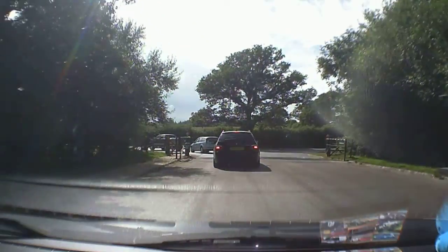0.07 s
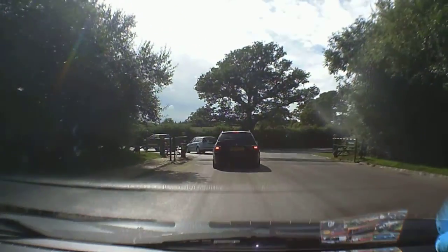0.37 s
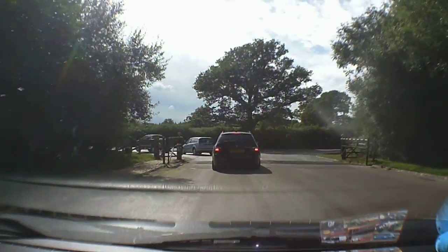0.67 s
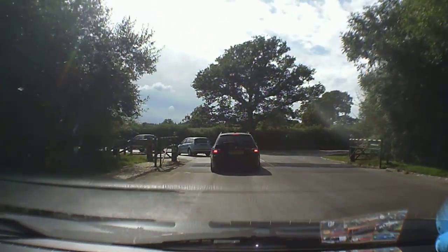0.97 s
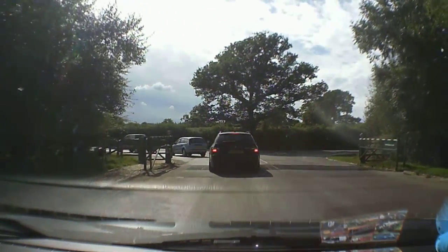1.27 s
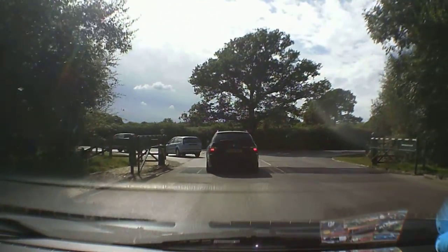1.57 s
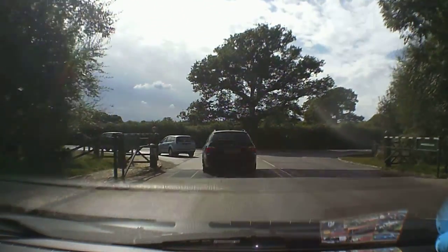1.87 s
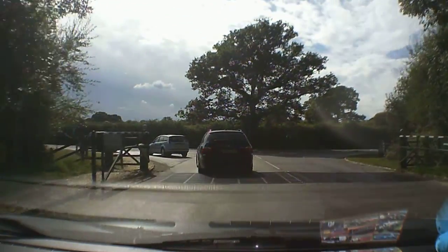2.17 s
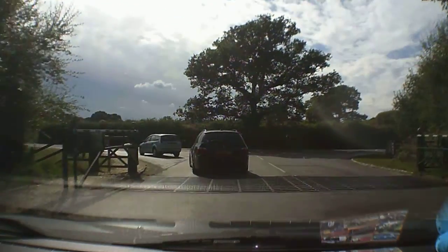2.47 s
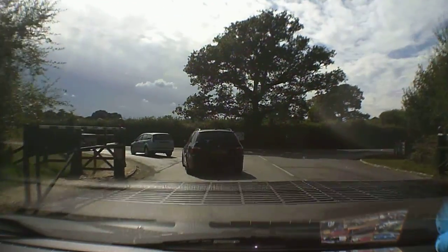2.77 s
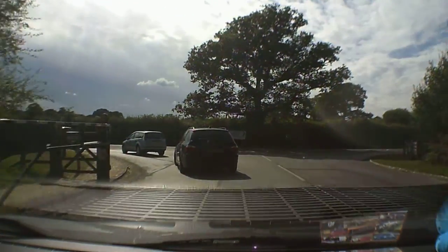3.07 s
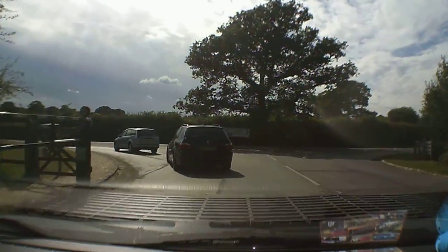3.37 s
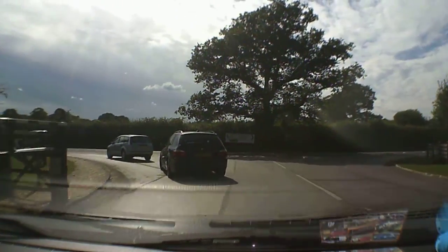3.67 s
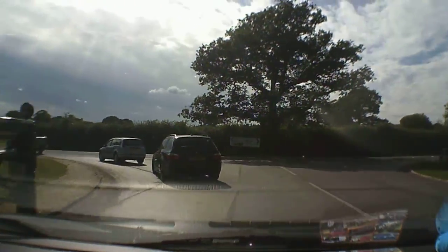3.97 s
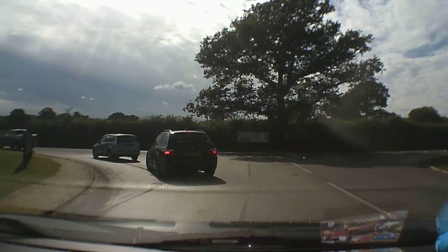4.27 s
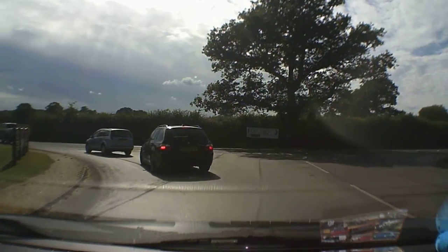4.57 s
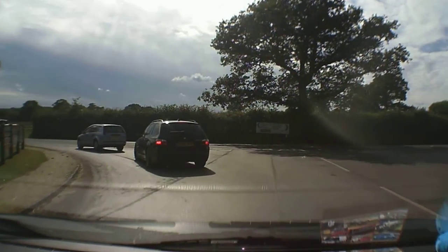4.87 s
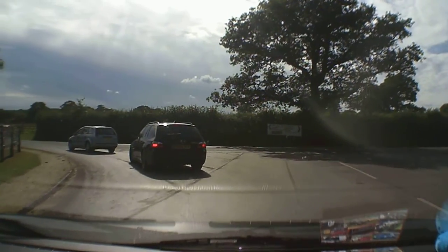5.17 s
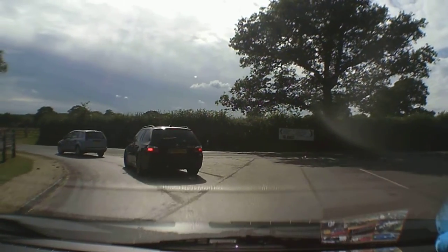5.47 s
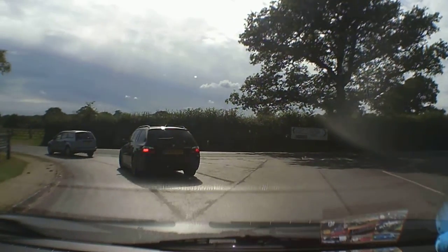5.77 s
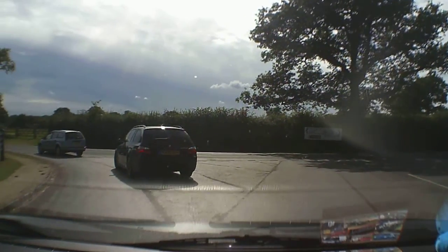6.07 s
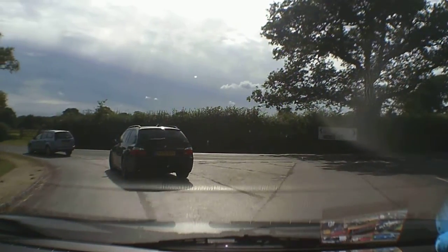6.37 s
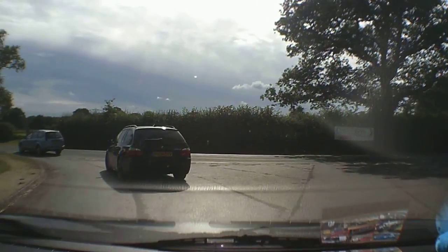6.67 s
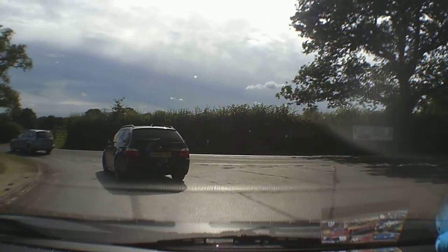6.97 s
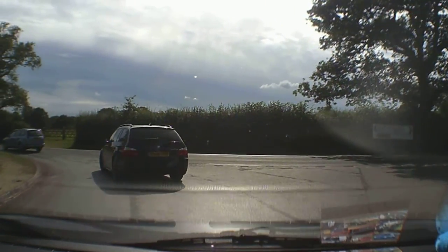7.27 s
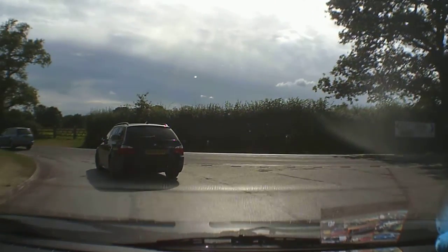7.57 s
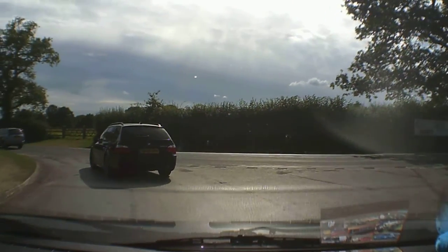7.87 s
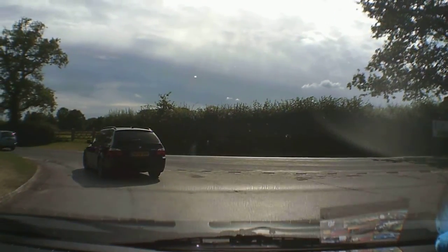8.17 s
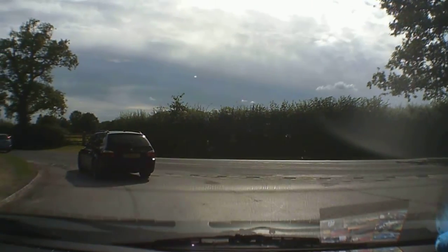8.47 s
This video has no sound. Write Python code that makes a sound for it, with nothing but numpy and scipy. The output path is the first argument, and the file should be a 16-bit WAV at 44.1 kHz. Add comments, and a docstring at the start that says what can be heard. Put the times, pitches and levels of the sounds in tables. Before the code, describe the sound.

A car rumbles slowly along rough asphalt, heard from a small microphone in the cabin, with a soft engine drone and a faint gear whine. Around four seconds in comes the loudest event, a rapid run of thumps and metallic rattling as both axles roll over a steel grid, shaking the plastic trim. After about a second and a half the steady rumble returns, and the engine finally pulls a little harder.

```python
"""Inside a car rolling slowly over a cattle grid, heard from a small camera behind the windscreen.
Front, then rear tyres drop on bar after bar. The impacts excite the modes of the body, which booms,
and of the steel grid, which clatters and rings; a loose plastic part ticks and the trim crackles.
Beneath lie the rumble of rough asphalt, the harmonics of an engine that picks up at the end,
a gear whine and the hiss of the camera's electronics."""
import sys
import numpy as np
from scipy import signal
from scipy.fft import rfft, irfft, next_fast_len
from scipy.io import wavfile
from scipy.ndimage import uniform_filter1d

SR = 44100
rng = np.random.default_rng(int(sys.argv[2]) if len(sys.argv) > 2 else 0)


def store_wav(level_fs):
    """Save 16-bit WAV to argv[1]."""
    pcm = np.round(np.clip(np.atleast_2d(level_fs), -1, 1) * 32767)
    wavfile.write(sys.argv[1], SR, pcm.T.astype(np.int16))


N = 380583
T = np.arange(N) / SR

# force of each axle's blows along the grid: (time [s], relative thump [dB], relative clatter [dB])
FRONT_BLOWS = [(3.92, -17, -45.5), (4.0, -17, -42.5), (4.18, -18.5, -39.5), (4.319, -22.5, -42),
               (4.47, -18, -40.5), (4.56, -17, -39), (4.67, -21, -41)]
REAR_BLOWS = [(4.485, -20, -41), (4.64, -18, -41), (4.7, -12.5, -39), (4.76, -16.5, -41.5),
              (4.91, -19.5, -44), (5.06, -26.5, -48.5), (5.16, -14, -52), (5.28, -19.5, -47)]
# spectrum of the clatter under each axle: (frequency [Hz], relative level [dB])
FRONT_SPECTRUM = [(71, -34), (120, -10), (157, -2.5), (308, -12.5), (372, -9.5), (561, -22), (638, -18),
                  (753, -21.5), (942, -22), (1020, -20.5), (2000, -42.5), (2600, -67), (4400, -120)]
REAR_SPECTRUM = [(71, -33), (120, -3), (143, -5.5), (188, -6.5), (232, -9), (287, -23), (403, -19),
                 (438, -22), (1160, -23), (1530, -33.5), (2000, -50), (2600, -83), (4400, -120)]

def cattle_grid():
    """Impact excitation: the front wheels cross with a bright clatter, the rear with a deep boom."""
    times, thumps, clatters = bar_blows(FRONT_BLOWS, first_s=3.915, count=15)
    front = body_boom(times, thumps - 2.5, axle="front")
    front += grid_clatter(times, clatters, FRONT_SPECTRUM, rattle_db=-1, rattle_t60=0.44,
                          steel_db=-12.5, slap_db=-3, slap_t60=0.052)
    front += wheel_knocks(times, clatters + 12)
    times, thumps, clatters = bar_blows(REAR_BLOWS, first_s=4.484, count=16)
    rear = body_boom(times, thumps + 0.75, axle="rear")
    rear += grid_clatter(times, clatters, REAR_SPECTRUM, rattle_db=0.2, rattle_t60=0.42,
                         steel_db=-21, slap_db=-17, slap_t60=0.055)
    rear += wheel_knocks(times, clatters + 3.5)
    return front + rear

def bar_blows(blows, first_s, count, period_s=0.0533, scatter_db=1.0):
    """Periodic forcing: at a steady speed the tyres meet the bars evenly, though with uneven force."""
    times = first_s + period_s * np.arange(count)
    at, *levels = np.transpose(blows)
    thumps, clatters = (np.interp(times, at, db) + scatter_db * rng.standard_normal(count)
                        for db in levels)
    return times, thumps, clatters

# body and cabin modes: (frequency [Hz], T60 [s], gain from front axle [dB], gain from rear axle [dB])
BODY_MODES = [(31.7, 0.4, -19, -7), (38.95, 0.3, -6.5, 0.5), (58.1, 0.12, -6.5, -4.5), (80, 0.11, -4, -9.5),
              (96.3, 0.14, -4, -11), (109.4, 0.07, -6.5, -14), (149, 0.11, -11.5, -23.5),
              (227, 0.11, -20.5, -41)]

def body_boom(times, levels_db, axle):
    """Modal superposition: each blow through the springs shares itself differently among the modes."""
    scatter_db = 1.8 * rng.standard_normal((len(times), len(BODY_MODES)))
    out = np.zeros(N)
    for k, (hz, t60, front_db, rear_db) in enumerate(BODY_MODES):
        mode = (-1) ** k * ring([(hz, t60, front_db if axle == "front" else rear_db)])
        out += strike(times, levels_db + scatter_db[:, k], mode)
    return out

# modes of the steel grid: (frequency [Hz], T60 [s], relative level [dB])
STEEL_MODES = [(378, .12, -4), (403, .14, -6), (647, .3, 0), (703, .09, -9), (1011, .2, -14),
               (1165, .26, -11.5)]

def grid_clatter(times, levels_db, spectrum, rattle_db, rattle_t60, steel_db, slap_db, slap_t60):
    """Incoherent summation: blows add in power as the loose grid chatters and the dashboard buzzes."""
    onset = 1 - np.exp(-T[:SR] / 0.0023)  # the soft tyre spreads each slap in time
    shake = (fade(rattle_t60) + undb(slap_db) * fade(slap_t60)) * onset
    chatter = np.sqrt(strike(times, 2 * levels_db, shake ** 2))
    rattle = chatter * noise(spectrum) * unit(undb(1.7 * walk(260)))
    response = ring(STEEL_MODES)
    steel = signal.fftconvolve(chatter * rng.standard_normal(N), response / np.linalg.norm(response))[:N]
    buzz = noise([(800, -14), (1900, 7.5), (3500, 3), (6000, -3.5), (15000, -16)])
    dashboard = chatter * buzz * undb(3.5 * walk(400))
    return undb(rattle_db) * rattle + undb(steel_db) * steel + undb(-32) * dashboard

# modes of a tyre's knock through the suspension: (frequency [Hz], T60 [s], relative level [dB])
WHEEL_MODES = [(130, 0.063, 2.5), (184, 0.048, -1), (344, .025, -2.5), (480, 0.032, -5), (656, 0.024, -5),
               (950, 0.0065, -14.5), (1250, 0.016, -15.5)]

def wheel_knocks(times, levels_db, leave_s=0.039, leave_db=-9):
    """Structure-borne sound: a tyre knocks on meeting a bar and again, more softly, on leaving it."""
    return taps(np.append(times, times + leave_s), np.append(levels_db, levels_db + leave_db),
                WHEEL_MODES, detune=0.071, scatter_db=3.5)

def rocking(start_s=5.335, hz=28, t60=0.9, db=-22.5):
    """Damped mass-spring oscillation: the car rocks on its springs as it leaves the grid."""
    return strike([start_s], [db], ring([(hz, t60, 0)]))

# landings of the plastic part: (time [s], relative peak level [dB])
LANDINGS = [(3.925, -52), (3.9784, -50), (4.0305, -44.5), (4.0831, -43.5), (4.1355, -57), (4.1914, -58),
            (4.245, -48.5), (4.2737, -53), (4.2986, -40.5), (4.353, -43), (4.4078, -52), (4.4618, -59),
            (4.5113, -46.5), (4.5376, -51), (4.565, -56), (4.59, -49), (4.6195, -45.5), (4.6438, -51),
            (4.7222, -47.5), (4.7505, -51), (4.7754, -55), (4.802, -45.5), (4.8294, -63), (4.8558, -59),
            (4.8833, -62), (4.9112, -62), (4.9641, -52), (5.0895, -57), (5.1407, -65), (5.1931, -64)]
# its modes: (frequency [Hz], T60 [s], relative level [dB])
PLASTIC_MODES = [(2360, .011, 0), (2680, .0095, 0), (3500, .005, -18), (4480, .008, -12), (4700, .009, -11)]

def loose_plastic():
    """Damped free vibration: a jolted part lands with a dry crack and rings for milliseconds."""
    times, levels_db = np.transpose(LANDINGS)
    contact = noise([(900, -13), (1700, -4), (3000, -2), (6000, -14), (12000, -30)])
    crack = strike(times, levels_db, fade(0.021)) * contact
    clacks = taps(times, levels_db, PLASTIC_MODES, detune=0.018, scatter_db=2.2)
    return undb(1) * clacks + undb(-16) * crack

# the main crackles: (time [s], dull band level [dB], bright band level [dB], duration [s])
TRIM_CRACKLES = [(.47, -79, -76, .004), (.828, -72, -73, .004), (2.56, -72, -80, .003),
                 (2.818, -72, -82, 0.011), (3.338, -63.5, -76, .008), (4.185, -72, -71, .003),
                 (4.195, -68, -69, 0.0034), (4.205, -72, -68, .002), (4.231, -71, -71, 0.0014),
                 (4.375, -69, -69, 0.0064), (4.665, -72, -71, .012), (4.682, -55.5, -63, 0.0098),
                 (5.324, -72, -79, .004), (5.343, -70, -75, .008), (5.43, -74, -74, .003),
                 (5.49, -72, -71, .004), (6.581, -73, -80, 0.0021), (7.753, -68, -72, .007),
                 (7.769, -71, -73, .004), (8.13, -68, -72, .011), (8.343, -72, -80, 0.0037),
                 (8.415, -70, -71, 0.0027), (8.426, -72, -72, 0.0028), (8.434, -68, -76, .012)]

def trim_crackles(slip_size=0.45, averaging_s=0.0071):
    """Stick-slip friction: as the body twists, the trim yields in a snap and a few smaller slips."""
    dull, bright = np.zeros(N), np.zeros(N)
    faint = [(s, -75.5, -73, 0.2) for s in rng.uniform(4.0, 6.5, size=14)]  # while the body is shaken
    for s, dull_db, bright_db, length in list(TRIM_CRACKLES) + faint:
        delays = np.append(0, rng.uniform(0, length, size=7))
        slips = np.append(1, slip_size * rng.standard_normal(size=7))
        slips *= np.sqrt(averaging_s * SR) / np.linalg.norm(slips)
        for delay, slip in zip(delays, slips):
            add(dull, s + delay, [undb(dull_db) * slip])
            add(bright, s + delay, [undb(bright_db) * slip])
    return (tint(dull, [(700, -22), (1700, 7.5), (4200, 1.5), (7000, -8), (15000, -30)])
            + tint(bright, [(3000, -13), (6500, -3), (9000, -1), (15600, 0)]))

# knocks in the cabin: (time [s], relative level [dB], centre frequency [Hz], bandwidth [Hz], T60 [s])
PANEL_KNOCKS = [(3.339, -52.5, 1380, 480, 0.035), (3.34, -54, 790, 450, 0.066), (3.458, -46, 410, 60, 0.1),
                (3.546, -62, 1300, 400, 0.031), (3.624, -57, 457, 300, 0.22), (3.822, -38.5, 130, 90, 0.17),
                (3.84, -58, 1270, 400, 0.03), (3.852, -58, 400, 295, 0.1), (3.862, -35.5, 127, 91.3, 0.096),
                (5.03, -28, 115, 60, 0.087), (5.187, -37, 115, 60, 0.081), (6.583, -48, 260, 258, 0.14)]

def panel_knocks():
    """Resonance: panels knock; the deep ones thud just before the grid and as the rear wheels cross."""
    out = np.zeros(N)
    for s, db, hz, width_hz, t60 in PANEL_KNOCKS:
        b, a = signal.iirpeak(hz, hz / width_hz, SR)
        panel = signal.lfilter(b, a, signal.lfilter(b, a, rng.standard_normal(N)))[-SR:]
        envelope = fade(t60) * (1 - np.exp(-hz * T[:SR]))  # a padded contact builds over about a cycle
        add(out, s, undb(db + 3) * unit(panel * envelope) * np.sqrt(np.mean(envelope ** 2)))
    return out

# rolling on asphalt: (time [s], relative rumble [dB], relative roar [dB])
ROLLING_LEVELS = [(0, -39.5, -66), (1.5, -39, -66), (2.6, -42.5, -69), (3.7, -42, -68.5),
                  (5.9, -41.5, -67.5), (6.6, -43.5, -70.5), (7.7, -41.5, -67.5), (8.1, -40.5, -63.5),
                  (8.6, -39, -63)]
# spectra of the body's rumble and the tread's roar: (frequency [Hz], relative level [dB])
RUMBLE_SPECTRUM = [(10, -9.5), (26, 3.5), (38, 7.5), (47, -0.5), (65, 3), (85, -7), (115, -6.5), (155, -10),
                   (185, -23), (225, -19.5), (300, -31), (600, -66.5)]
ROAR_SPECTRUM = [(150, -18.5), (260, 6), (345, 12), (430, 4.5), (640, 0.5), (830, -1.5), (980, -2.5),
                 (1170, -2), (1450, -9), (1800, -20.5), (2600, -23.5), (6000, -49)]

def road():
    """Roughness excitation: the body rumbles and the tread roars, louder over the grid's hollow pit."""
    rumble_db, roar_db = curves(ROLLING_LEVELS)
    over_pit = hold(3.81, 5.224, attack=0.15, release=0.36)
    rumble = noise(RUMBLE_SPECTRUM) * undb(rumble_db + 3 + 8.4 * over_pit + 1.3 * walk(12))
    roar = noise(ROAR_SPECTRUM) * undb(roar_db + 4 + 6.6 * over_pit + 1.1 * walk(25))
    return rumble + roar

# engine speed, with an abrupt sag as at a gear change: (time [s], firing rate [Hz])
FIRING_RATE = [(0, 36.2), (1.1, 37.2), (2.05, 32.34), (2.5, 34.9), (3.05, 32.7), (3.8, 34.7), (5.5, 35.03),
               (5.75, 37.12), (6.1, 36.22), (6.35, 32.6), (6.8, 32.58), (7.1, 36.9), (7.4, 36.55),
               (7.77, 39.73), (7.81, 21.37), (8.07, 38.34), (8.25, 43.07), (8.6, 40.25)]
# accelerator presses: (down [s], up [s], boom lift [dB], growl lift [dB], drone lift [dB])
PRESSES = [(0.347, 1.705, 11.5, -1, 0.5), (2.099, 2.743, 18, 10.5, 3.5), (3.3, 3.899, 11.5, 7.5, 6.5),
           (5.399, 6.2, 14.5, 12.5, 9.5), (6.797, 7.731, 16.5, 12.5, 14), (7.854, 8.7, 27, 9.5, 13)]
# harmonics that follow the drone's level: (multiple of the firing rate, relative level [dB])
HARMONICS = [(4, 1), (5, -5.5), (7, -8), (8, -8), (9, -26), (10, -13.5), (13, -14.5)]
# air resonances that lift those harmonics: (frequency [Hz], half width [Hz], gain [dB])
AIR_RESONANCES = [(115.4, 17, 19.5), (224, 18, 11.5), (338, 10, 12.5)]

def engine():
    """Harmonic series: a muffled four-cylinder hums at unsteady multiples of its firing rate."""
    hz, = curves(FIRING_RATE)
    boom_db, growl_db, drone_db = sum(np.outer(lifts_db, hold(down, up, attack=0.18, release=0.18))
                                      for down, up, *lifts_db in PRESSES)
    phase = 2 * np.pi * np.cumsum(hz * (1 + 0.011 * walk(60))) / SR
    judder_db = 15.7 * bell(T, centre=7.93, width=0.1)  # on picking up from low revs
    orders = [(2, boom_db - 56.5), (3, growl_db - 55.5), (6, drone_db - 72 + 2 * walk(24))]
    for k, db in HARMONICS:
        lift_db = sum(gain_db * bell(k * hz, centre, width) for centre, width, gain_db in AIR_RESONANCES)
        if k % 4 == 0:
            lift_db += judder_db
        orders.append((k, drone_db - 75.5 + db + lift_db + 1.9 * walk(24)))
    return sum(np.sqrt(2) * undb(db + 1.3 * walk(14)) * np.sin(k * phase) for k, db in orders)

# pitch of the gear whine, following road speed: (time [s], frequency [Hz])
WHINE_PITCH = [(0, 342), (.6, 335.7), (2, 349.3), (4.7, 415), (5.6, 395.5), (6.3, 375.7), (7.0, 362),
               (7.6, 338), (8.6, 325)]
# swells as the teeth take up load: (time [s], half width [s], level [dB])
TOOTH_LOADS = [(.2, 0.028, -61), (.54, 0.094, -62.5), (1.6, 0.56, -75), (4.75, 0.46, -66.5),
               (5.7, 0.36, -64.5), (6.97, 0.21, -59.5), (7.35, 0.25, -66)]
# faint passing tones: (time [s], duration [s], frequency [Hz], glide [Hz/s], level [dB])
FAINT_TONES = [(.2, .55, 805, 70, -74.5), (1.8, .6, 995, 0, -80), (2.4, .22, 1100, 170, -73),
               (2.65, .25, 1250, 90, -78), (3.35, .55, 1258, 0, -80), (5.4, .75, 925, 40, -78),
               (5.8, .22, 838, -50, -73), (7.2, .85, 1260, 0, -80.5), (7.66, .2, 825, 50, -75),
               (2.65, .14, 4520, 0, -85)]

def gears():
    """Gear meshing: the transmission gives a thin wavering whine; faint tones come and go above it."""
    hz, = curves(WHINE_PITCH)
    gain = undb(-79) + sum(undb(db) * bell(T, s, width) for s, width, db in TOOTH_LOADS)
    waver = 1 + 0.009 * walk(45)
    whine = gain * tone(hz * waver, 0)
    singing = sum(swell(s, length) * tone((pitch + glide * (T - s)) * np.sqrt(waver), db)
                  for s, length, pitch, glide, db in FAINT_TONES)
    return (whine + singing) * undb(2.24 * walk(17))

# steady whistles and the partials of a thin buzz: (frequency [Hz], level [dB])
WHISTLE_TONES = [(7872, -80.3), (12985, -92.5), (14702, -92.5), (14762, -99)]
BUZZ_PARTIALS = [(5670, -85), (8505, -84), (11340, -84)]
# brief buzzes and high, rough chirps: (time [s], duration [s])
BUZZ_TIMES = [(.64, .05), (7.625, .055), (8.195, .09)]
CHIRP_TIMES = [(1.135, .04), (4.235, .04), (8.13, .045)]
# spectra of the circuit's noises: (frequency [Hz], relative level [dB])
HISS_SPECTRUM = [(10, 11), (3000, 0), (5000, -1), (8000, -2), (12000, -2.5), (16000, -3.5)]
FIZZ_SPECTRUM = [(4500, -16), (5700, 0), (6600, 2), (7500, -8), (8400, 0), (9600, -6), (10500, 0),
                 (11400, -2), (12200, -20)]
CHIRP_SPECTRUM = [(8000, -40), (10200, -20), (10450, 0), (10800, -14), (11250, 1), (11600, -30)]

def electronics():
    """Self-noise: the camera's circuits hiss, whistle, buzz, chirp and fizz softly twice a second."""
    whistles = sum(tone(hz, db) for hz, db in WHISTLE_TONES)
    buzz = sum(tone(hz, db) for hz, db in BUZZ_PARTIALS)
    buzzes = sum(swell(s, length) for s, length in BUZZ_TIMES) * buzz
    bursts = sum(swell(second + s, length=0.15) for second in range(8) for s in (0.12, 0.56))
    fizz = bursts * noise(FIZZ_SPECTRUM)
    chirps = sum(swell(s, length) for s, length in CHIRP_TIMES) * noise(CHIRP_SPECTRUM)
    return undb(-73) * noise(HISS_SPECTRUM) + whistles + buzzes + undb(-76) * chirps + undb(-78.3) * fizz

def taps(times, levels_db, modes, detune, scatter_db):
    """Impacts of given peak level: each lands on a new spot, which shifts the modes and their shares."""
    out, t = np.zeros(N), T[:SR // 10]
    hz, t60, db = np.transpose(modes)
    signs = (-1) ** np.arange(len(hz))
    decays = np.exp(-np.log(1000) * np.outer(1 / t60, t))
    for s, peak_db in zip(times, levels_db):
        shift, share = rng.standard_normal((2, len(hz)))
        rings = decays * np.sin(2 * np.pi * np.outer(hz * (1 + detune * shift), t))
        tap = (signs * undb(db + scatter_db * share)) @ rings
        add(out, s, undb(peak_db) * tap / np.abs(tap).max())
    return out

def ring(modes):
    """Impulse response of damped modes, neighbours in opposite phase."""
    return sum((-1) ** k * undb(db) * fade(t60) * np.sin(2 * np.pi * hz * T[:SR])
               for k, (hz, t60, db) in enumerate(modes))

def strike(times, levels_db, response):
    """Linear superposition of one response for each blow."""
    out = np.zeros(N)
    for s, db in zip(times, levels_db):
        add(out, s, undb(db) * response)
    return out

def add(out, s, sound):
    """Superpose a sound from time s."""
    i = max(int(s * SR), 0)
    out[i:i + len(sound)] += sound[:N - i]

def tone(hz, db):
    """A sinusoid of given rms level; phase is the integral of frequency."""
    return np.sqrt(2) * undb(db) * np.sin(2 * np.pi * np.cumsum(hz * np.ones(N)) / SR)

def noise(spectrum):
    """Coloured noise of rms 1."""
    return unit(tint(rng.standard_normal(N), spectrum))

def tint(x, spectrum):
    """Spectral shaping by (frequency [Hz], relative level [dB]) points, silent above the last."""
    hz, db = np.transpose(spectrum)
    size = next_fast_len(N, real=True)
    f = np.maximum(np.fft.rfftfreq(size, 1 / SR), 1)
    gain = undb(np.interp(np.log(f), np.log(hz), db)) * (f < hz[-1])
    return irfft(rfft(x, size) * unit(gain), size)[:N]

def walk(rate_hz):
    """Smooth random modulation of rms 1."""
    k = int(SR / rate_hz)
    steps = np.repeat(rng.standard_normal(N // k + 1), k)
    return unit(uniform_filter1d(uniform_filter1d(steps, k), k)[:N])

def fade(t60):
    """One second of exponential decay, falling 60 dB in t60 seconds."""
    return np.exp(-np.log(1000) * T[:SR] / t60)

def swell(s, length):
    """A cosine-tapered envelope that rises, holds and falls."""
    return strike([s], [0], signal.windows.tukey(int(length * SR)))

def hold(start, end, attack, release):
    """A trapezoidal envelope: rises from the start, falls from the end."""
    return np.clip(np.minimum((T - start) / attack, 1 - (T - end) / release), 0, 1)

def bell(x, centre, width):
    """A Gaussian of height 1."""
    return np.exp(-((x - centre) / width) ** 2)

def curves(rows):
    """Linear interpolation of a table's columns in time."""
    times, *columns = np.transpose(rows)
    return [np.interp(T, times, column) for column in columns]

def undb(db):
    """Decibels to amplitude ratio."""
    return 10 ** (np.asarray(db) / 20)

def unit(x):
    """Normalise to rms 1."""
    return x / np.sqrt(np.mean(x ** 2))

def scene():
    """Superposition: all sources sum at the one microphone in the cabin."""
    crossing = cattle_grid() + rocking() + loose_plastic() + trim_crackles() + panel_knocks()
    return (crossing + road() + engine() + gears())[None]

def record(dry):
    """Band limiting: the camera adds its own noise, then loses the deepest bass and the top treble."""
    high_pass = signal.butter(2, 14, "high", fs=SR, output="sos")
    low_pass = signal.ellip(14, 0.2, 90, 15650, fs=SR, output="sos")
    return signal.sosfilt(low_pass, signal.sosfilt(high_pass, dry + electronics()))

dry = scene()
out = record(dry)
store_wav(out)
```